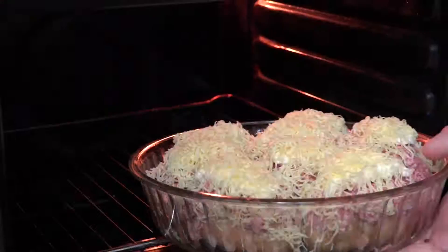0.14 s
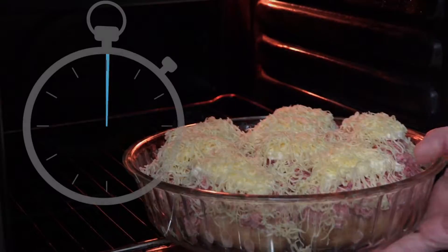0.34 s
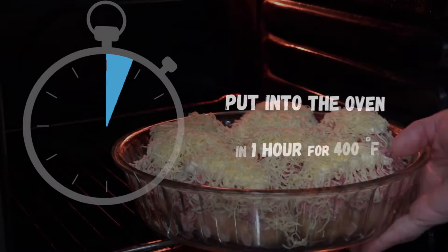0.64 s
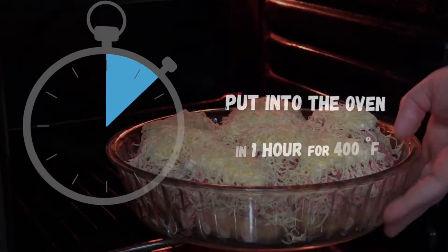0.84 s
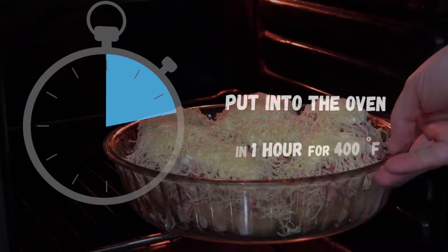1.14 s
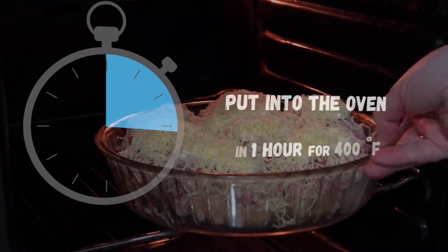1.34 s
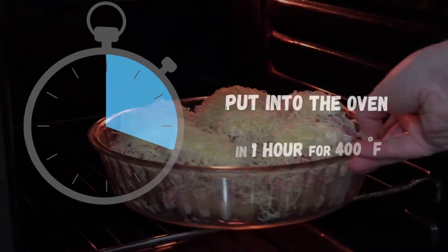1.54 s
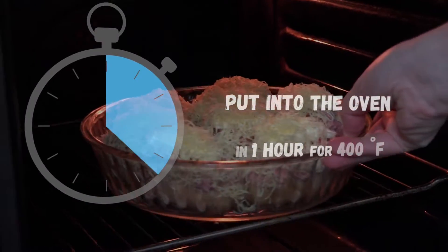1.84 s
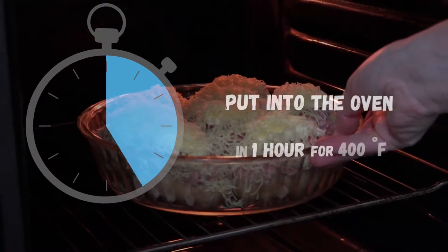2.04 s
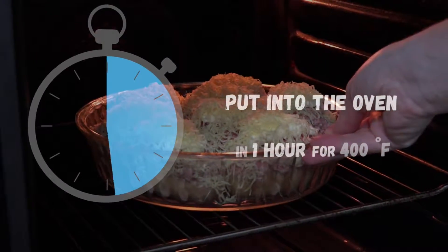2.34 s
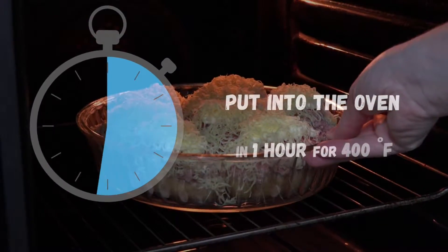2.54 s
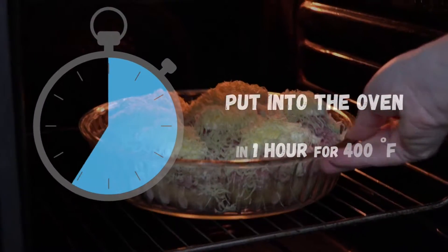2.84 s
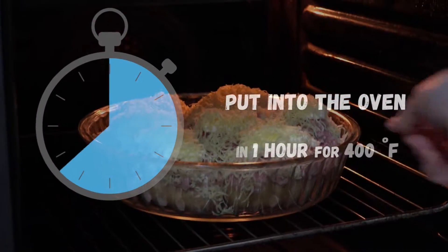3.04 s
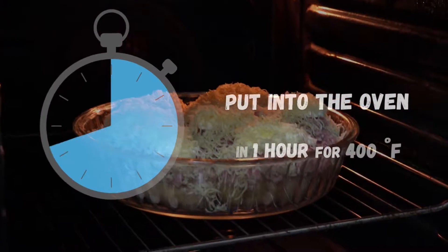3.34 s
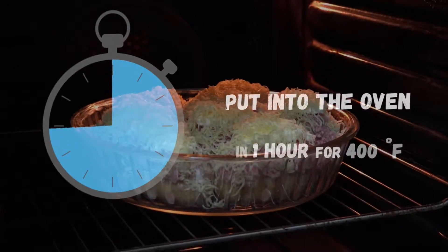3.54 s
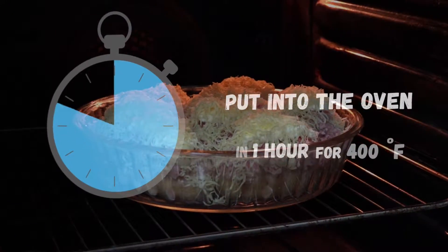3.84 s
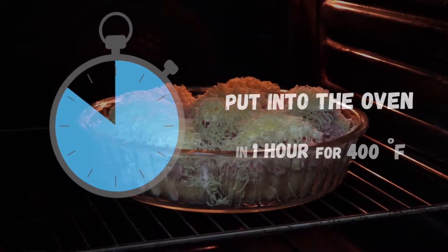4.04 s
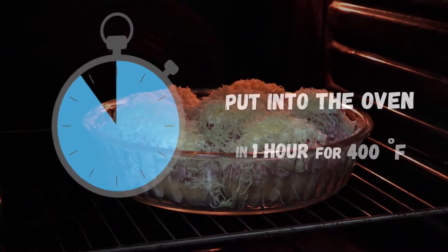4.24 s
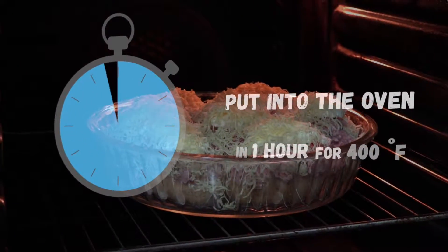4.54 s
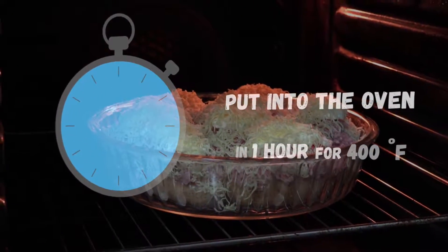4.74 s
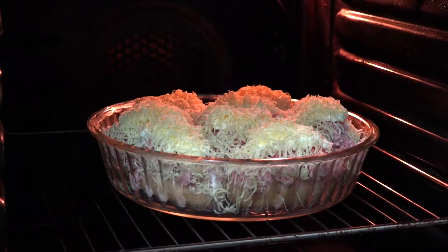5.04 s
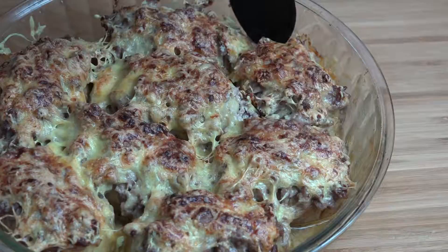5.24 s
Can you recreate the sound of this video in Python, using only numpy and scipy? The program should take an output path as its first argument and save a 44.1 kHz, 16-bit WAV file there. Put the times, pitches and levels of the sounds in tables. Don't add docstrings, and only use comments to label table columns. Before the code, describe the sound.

Inside a humming, softly blowing electric oven, glass scrapes jerkily over metal wires for two seconds, then hot steel snaps sharply a few times.

```python
import sys
import numpy as np
from scipy import signal
from scipy.fft import rfft, irfft, next_fast_len
from scipy.io import wavfile
from scipy.ndimage import uniform_filter1d, map_coordinates

SR = 44100
rng = np.random.default_rng(int(sys.argv[2]) if len(sys.argv) > 2 else 0)


def elevation(decibels):
    levels = np.asarray(decibels, float)
    return 10 ** (levels / 20)


def store_wav(level_fs):
    pcm = np.round(np.clip(np.atleast_2d(level_fs), -1, 1) * 32767)
    wavfile.write(sys.argv[1], SR, pcm.T.astype(np.int16))


N = 237376
MAINS_HZ = 50.02
SPAN_S = (.1959, 5.2361)


def unit(x):
    return x / np.sqrt(np.mean(x ** 2) + 1e-20)


def along(points, hz):
    f, value = np.transpose(points)
    return np.interp(np.log(hz + 1), np.log(f + 1), value)


def curves(rows):
    t_s, *columns = np.transpose(rows)
    return [np.interp(np.arange(N) / SR, t_s, column) for column in columns]


def wobble(rate_hz):
    knots = rng.standard_normal(int(N * rate_hz / SR) + 4)
    return unit(map_coordinates(knots, [np.arange(N) * rate_hz / SR]))


def swells(rows, rest_db=-120):
    t = np.arange(N) / SR
    power = elevation(2 * rest_db)
    for s, *sides, db in rows:
        width = np.where(t < s, sides[0], sides[-1]) * len(sides) / 2
        power = power + elevation(2 * db) * np.exp(-2 * ((t - s) / width) ** 2)
    return np.sqrt(power)


def filtered(x, response):
    m = next_fast_len(N + SR // 2)
    return irfft(rfft(x, m) * response(np.fft.rfftfreq(m, 1 / SR)), m)[:N]


def resonant(modes):
    def response(f):
        total = 0
        for k, (hz, width, db) in enumerate(modes):
            damping = 1j * f * width
            total = total + (-1) ** k * elevation(db) * damping / (hz * hz - f * f + damping)
        return total
    return response


def patchy(depth_db, bins, frames):
    z = signal.stft(rng.standard_normal(N), nperseg=512)[2]
    field = uniform_filter1d(rng.standard_normal(z.shape), bins, 0)
    field = uniform_filter1d(field, frames, 1)
    return signal.istft(z * elevation(depth_db * unit(field)), nperseg=512)[1][:N]


def tone(turns, wander_db, rate_hz):
    level = np.sqrt(2) * elevation(wander_db * wobble(rate_hz))
    return level * np.sin(2 * np.pi * (turns + rng.random()))


# t/s, level/dB
SHELL_HUM = [(0.28, -22), (0.35, -22.5), (0.55, -20), (0.64, -22), (1.13, -18), (2.05, -19), (2.4, -15),
             (2.97, -14), (3.06, -15.5), (3.57, -16), (4.91, -14), (5.2, -13.5)]
# t/s, length/s, level/dB
LOADED = [(.35, .3, -36), (.7, .3, -30), (1.38, .4, -31), (2.15, .3, -37.5), (3.9, .5, -41.5),
          (4.7, .2, -34.5), (5.15, .4, -31)]
# multiple of half the mains, level/dB
SHAFT = [(5, -42.5), (7, -40.5), (9, -46), (10, -52), (11, -51.5), (13, -56.5), (16, -44), (17, -45)]
# t/s, f/Hz
FAN = [(.2, 150.403), (.9, 150.27), (1.6, 150.153), (2.3, 150.421), (3, 150.659), (3.6, 150.053),
       (4.2, 149.457), (4.7, 149.331), (5.25, 149.222)]
# multiple of the blade rate, level/dB
BLADES = [(1, -41.5), (3, -40.5), (5, -36.5), (7, -50.5)]
# multiple, in step at t/s, blade level/dB, mains level/dB
BEATS = [
    (2, .75, -40, -41),
    (4, .425, -33.5, -42),
]


def hum():
    t = np.arange(N) / SR
    level = np.sqrt(2) * elevation(curves(SHELL_HUM)[0] + .3 * wobble(6))
    shell = level * np.sin(4 * np.pi * MAINS_HZ * (t - SPAN_S[1]))
    shell += swells(LOADED, rest_db=-34) * tone(4 * MAINS_HZ * t, wander_db=.9, rate_hz=9)
    shaft = sum(elevation(db) * tone(k * MAINS_HZ / 2 * t, wander_db=2, rate_hz=3.3) for k, db in SHAFT)
    turns = np.cumsum(curves(FAN)[0]) / SR
    blades = sum(elevation(db) * tone(k * turns, wander_db=2, rate_hz=6) for k, db in BLADES)
    for k, s, blade_db, mains_db in BEATS:
        blade_level = np.sqrt(2) * elevation(blade_db + 1.3 * wobble(7))
        blades += blade_level * np.sin(2 * np.pi * k * (turns - turns[round(s * SR)]))
        blades += np.sqrt(2) * elevation(mains_db) * np.sin(2 * np.pi * k * 3 * MAINS_HZ * (t - s))
    return shell + shaft + blades


# peak t/s, rise/s, fall/s, grind level/dB, hiss over grind/dB
SCRAPES = [(.26, 0.063, 0.11, -30.5, -12.5), (.4, .1, 0.091, -25, -15), (.55, 0.13, 0.15, -30.5, -10.5),
           (.67, 0.076, 0.076, -28.5, -8.5), (.82, .02, 0.022, -31, -22.5), (.81, .1, 0.11, -35, -6),
           (1.29, .015, .03, -30, -11), (1.3, 0.078, .1, -36.5, -4.5), (1.36, 0.011, 0.016, -25.5, -15),
           (1.46, 0.14, 0.12, -28, -10.5), (1.645, 0.14, 0.077, -20, -10.5), (1.75, 0.07, 0.18, -30, -8),
           (1.903, .012, 0.052, -25, 0), (1.96, .05, .05, -28, -4.5), (2.05, 0.13, 0.1, -29, -2.5),
           (2.21, 0.085, 0.04, -33, -5), (2.27, .1, 0.11, -38.5, -5)]
# f/Hz, level/dB
DULL = [(300, -31), (800, 8), (1500, 8.5), (2300, -8.5), (3500, -28)]
GRIND = [(1000, -24.5), (2300, -2.5), (3000, -3.5), (5000, -7), (7000, -15), (11000, -38)]
HISS = [(2000, -51), (5000, -1), (7000, -2.5), (9300, -2.5), (10500, -12), (14000, -12), (16000, -27.5)]


def slide():
    knots = rng.standard_normal(400)

    def rack_db(f):
        return 4 * np.tanh(map_coordinates(knots, [f / 60], mode="nearest"))

    def grit(spectrum):
        rub = patchy(1.4, 5, 4) * elevation(.65 * wobble(240) + .97 * wobble(35.2))
        return unit(filtered(rub, lambda f: elevation(along(spectrum, f) + rack_db(f))))

    def strokes(hiss_share, db):
        return swells([(s, rise, fall, level + db + hiss_share * bright)
                       for s, rise, fall, level, bright in SCRAPES])

    dull, grind, hiss = grit(DULL), grit(GRIND), grit(HISS)
    return strokes(0, -2.53) * grind + strokes(-.5, -11.5) * dull + strokes(1, .3) * hiss


# t/s, length/s, f/Hz, level/dB
WIRES = [(.257, .08, 2410, -37), (.347, .08, 1380, -33), (.35, .1, 2600, -33), (.35, .08, 2380, -35),
         (.412, .08, 2930, -31), (.569, .4, 2920, -36), (.666, .19, 2630, -35), (.671, .11, 2930, -29),
         (1.402, .14, 3220, -37), (1.462, .18, 3010, -34), (1.52, .1, 1310, -33), (1.556, .08, 4780, -33),
         (1.561, .11, 5250, -36), (1.57, .07, 1710, -33), (1.576, .11, 4480, -34), (1.61, .08, 2930, -32),
         (1.629, .07, 2460, -32), (1.629, .13, 6680, -39), (1.65, .1, 3500, -34), (1.651, .08, 4610, -33),
         (1.669, .11, 2290, -29), (1.911, .07, 7110, -37), (1.92, .06, 9150, -36), (1.92, .06, 1300, -33),
         (1.92, .06, 7700, -37), (1.92, .06, 3600, -35), (2.058, .1, 8350, -41), (2.06, .09, 6200, -41),
         (2.215, .07, 5100, -43)]


def wires():
    t = np.arange(-SR // 2, SR // 2) / SR
    out = np.zeros(N + SR)
    for s, length, hz, db in WIRES:
        swell = np.exp(-(2 * t / length) ** 2)
        b, a = signal.iirpeak(hz, hz / (.006 * hz + 25), SR)
        band = swell * signal.lfilter(b, a, rng.standard_normal(SR))
        level = elevation(db + 1.45) * np.linalg.norm(swell) / np.linalg.norm(band)
        out[round(s * SR):][:SR] += level * band
    return out[SR // 2:][:N]


# t/s, length/s, f/Hz, level/dB
THUDS = [
    (1.45, .3, 300, -34.5),
    (1.93, .12, 130, -29.5),
    (2.95, .45, 45, -31),
]


def thuds():
    out = np.zeros(N)
    for s, length, hz, db in THUDS:
        mode = resonant([(hz, .8 * hz, 0)])
        rumble = unit(filtered(rng.standard_normal(N), lambda f: mode(f) ** 2))
        out += swells([(s, length, db)]) * rumble
    return out


# t/s, peak level/dB, main ring f/Hz, upper ring f/Hz, upper ring level/dB
TICKS = [
    (2.8117, -21, 6500, 10400, -6),
    (2.8125, -30, 5200, 7300, 0),
    (2.8473, -23, 6350, 9500, -7),
    (3.0333, -38, 6200, 8400, -4),
    (3.057, -40, 5900, 7000, -3),
    (3.8782, -23, 6050, 9250, 1),
]


def ticks():
    rise_s, ring_t60_s, crack_t60_s = .0006, .008, .006
    out = np.zeros(N)
    t = np.arange(SR // 20) / SR
    rise = 1 - np.exp(-(t / rise_s) ** 2)
    for s, db, hz, upper_hz, upper_db in TICKS:
        ring = np.sin(2 * np.pi * hz * t) + elevation(upper_db) * np.sin(2 * np.pi * upper_hz * t)
        ring = rise * ring * elevation(-60 * t / ring_t60_s)
        crack = 1.1 * np.sqrt(rise) * rng.standard_normal(len(t)) * elevation(-60 * t / crack_t60_s)
        out[round(s * SR):][:len(t)] += elevation(db + 2.5) * (ring + crack)
    return filtered(out, resonant([(7500, 6000, 0)]))


# f/Hz, level/dB per Hz
AIR = [(20, 4), (42, -2), (70, -8.5), (130, -1.5), (220, -5), (340, -13), (480, -4), (700, 0), (840, -1.5),
       (1640, -9.5), (3900, -23), (8000, -40.5), (11000, -52.5), (15700, -56.5)]
# f/Hz, width/Hz, level over the rush/dB
CAVITY = [(492, 34, 6), (523.8, 19, 7), (569, 9.9, -13.5), (744, 31, 7.5), (752, 13, -1), (808, 36, -5.5),
          (351, 21, 7.5), (1363, 150, 3.5), (1770, 27, 3.5), (2490, 18, 10), (3260, 110, 3),
          (5540, 1700, 3.5), (8740, 1000, 7.5)]
# f/Hz, width/Hz, level/dB
UPPER = [(924.5, 49, -3), (1048.2, 27.5, 3.5), (1073, 59, 1.5), (1211, 61, -4)]
# t/s, length/s, level/dB
UPPER_FITS = [(1.1, 1.7, -34), (3, 0.32, -31), (3.72, 0.4, -29.5), (4.75, 1.9, -28)]


def air():
    def lift_db(f):
        return sum(db / (1 + (2 * (f - hz) / width) ** 2) for hz, width, db in CAVITY)

    rush = filtered(patchy(.72, 4, 12), lambda f: elevation(along(AIR, f) + lift_db(f)))
    upper = filtered(patchy(.85, 2, 14), resonant(UPPER))
    flutter_db = .35 * wobble(6)
    return elevation(-25 + flutter_db) * unit(rush) + swells(UPPER_FITS, rest_db=-33) * unit(upper)


# t/s, length/s, level/dB
SLOW_SURGES = [(.47, .5, -20.5), (.88, 0.22, -20), (1.45, .5, -18.5), (1.8, 0.3, -22), (2.45, 0.31, -20),
               (3.27, 0.89, -13), (3.8, 0.43, -18), (4.4, 0.45, -18.5), (4.76, 0.23, -23),
               (5.17, 0.22, -21)]
# t/s, length/s, level/dB
QUICK_SURGES = [(.25, .15, -33), (.66, .4, -22.5), (1.05, .3, -26), (1.55, .4, -23), (2.15, .3, -30),
                (2.55, .3, -24), (2.87, .35, -17.5), (3.2, .3, -25), (4, .35, -17), (4.5, .25, -25),
                (5.07, .2, -29)]


def sway():
    slow = tone(np.cumsum(10.8 + .7 * wobble(2.5)) / SR, wander_db=.3, rate_hz=3)
    quick = tone(np.cumsum(26 + 2.5 * wobble(4)) / SR, wander_db=.6, rate_hz=6)
    return swells(SLOW_SURGES, rest_db=-27) * slow + swells(QUICK_SURGES, rest_db=-32) * quick


# f/Hz, width/Hz, level/dB
LAMINATE = [(11425, 80, -11), (11655, 60, -7), (11878, 65, 2), (12060, 100, -5), (12290, 90, -11),
            (12500, 90, -9), (12720, 100, -14), (13320, 200, -17), (13600, 100, -16)]
BRACKET = [(14000, 100, -18), (14230, 100, -18), (14460, 80, -11), (14657, 70, 2), (14860, 90, -12),
           (15080, 100, -17)]
COIL = [(3184, 87, -3), (3400, 85, -0.5), (3873, 62, 3)]
# t/s, length/s, level/dB
LAMINATE_FITS = [(2.6, .9, -62), (3.35, .3, -62), (3.85, .2, -61), (4.5, .9, -59.5), (5.15, .6, -61)]
BRACKET_FITS = [(.95, .6, -62), (3.5, .8, -59), (4.5, .6, -61.5), (5.1, .6, -63)]
COIL_FITS = [(2.65, 0.68, -49)]


def buzz():
    at = np.arange(1, N / SR * MAINS_HZ - 1)[:, None] * SR / MAINS_HZ
    taps = np.floor(at) + np.arange(-15, 17)
    shape = np.sinc(taps - at) * np.cos(np.pi * (taps - at) / 32) ** 2
    sizes = elevation(1.4 * rng.standard_normal(at.shape))
    snaps = np.bincount(taps.astype(int).ravel(), (shape * sizes).ravel(), N)

    def rung(modes):
        def response(f):
            total = 0
            for hz, width, db in modes:
                late = np.exp(-2j * np.pi * f * .01 * rng.random())
                total = total + resonant([(hz, width, db / 2)])(f) ** 2 * late
            return total
        return unit(filtered(snaps, response))

    laminate = swells(LAMINATE_FITS, rest_db=-64) * rung(LAMINATE)
    bracket = swells(BRACKET_FITS, rest_db=-67) * rung(BRACKET)
    coil = swells(COIL_FITS, rest_db=-46) * elevation(.8 * wobble(1.5)) * rung(COIL)
    return laminate + bracket + coil


# t/s, length/s, level/dB
SLEEVE = [
    (3.18, .06, -55.5),
    (3.26, .12, -56.5),
    (3.34, .08, -52),
]
# f/Hz, level/dB
CLOTH = [(5000, -30), (8500, 0), (13000, -2), (16000, -9)]


def sleeve():
    return swells(SLEEVE) * unit(filtered(patchy(1.81, 5, 4), lambda f: elevation(along(CLOTH, f))))


def kitchen(x):
    t60_s = .15
    t = np.arange(SR // 3) / SR
    tail = rng.standard_normal(len(t)) * elevation(-60 * t / t60_s)
    return signal.fftconvolve(x, tail / np.linalg.norm(tail))[:N]


def scene():
    steel = ticks()
    oven = hum() + air() + sway() + buzz()
    dish = slide() + wires() + thuds() + sleeve()
    return (oven + dish + steel + elevation(-11) * kitchen(steel))[None]


def low_pass(x):
    return signal.sosfilt(signal.butter(12, 16790, fs=SR, output="sos"), x)


def record(dry):
    top_hz, edge_s = 15760, .00005
    t = np.arange(N) / SR
    fade_in = np.clip((t - SPAN_S[0]) / edge_s, 0, 1)
    fade_out = np.clip((SPAN_S[1] - t) / edge_s, 0, 1)
    mix = filtered(dry[0], lambda f: f < top_hz) * fade_in * fade_out
    return low_pass(mix[None])


dry = scene()
out = record(dry)
store_wav(out)
```